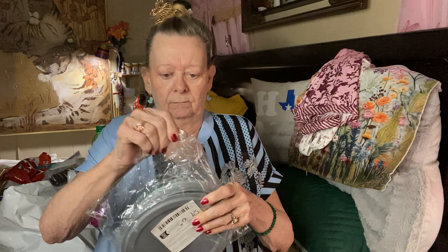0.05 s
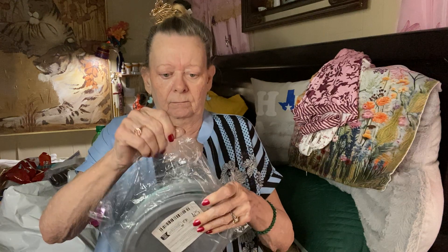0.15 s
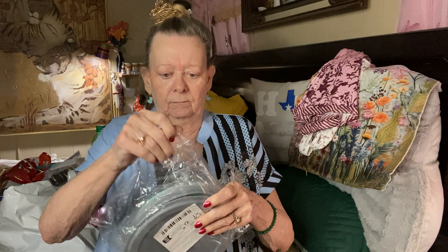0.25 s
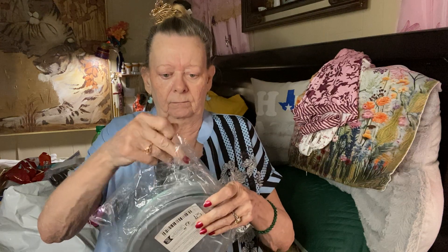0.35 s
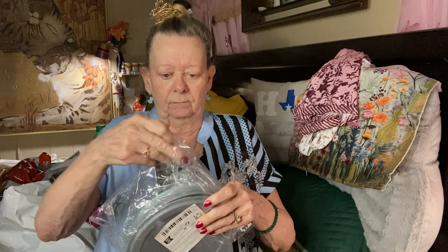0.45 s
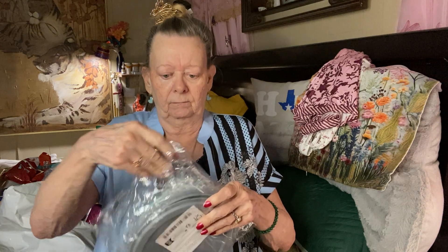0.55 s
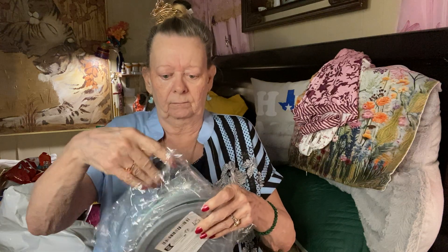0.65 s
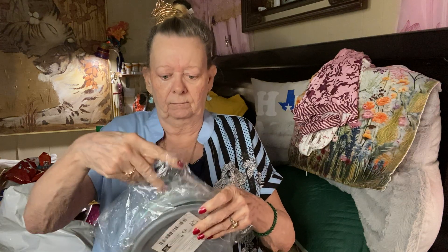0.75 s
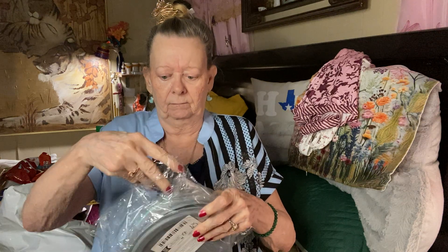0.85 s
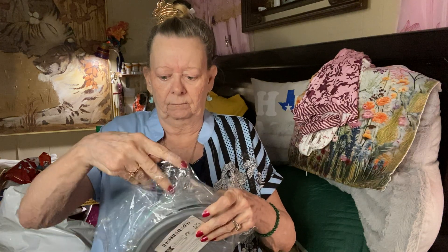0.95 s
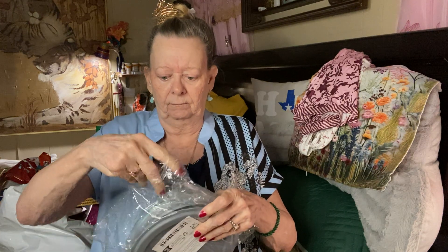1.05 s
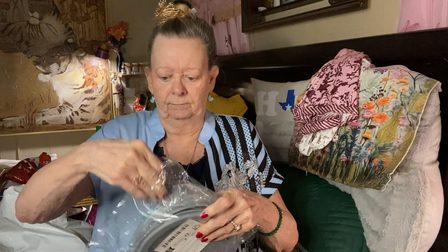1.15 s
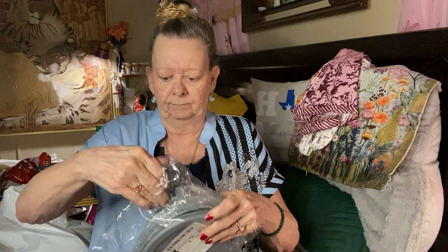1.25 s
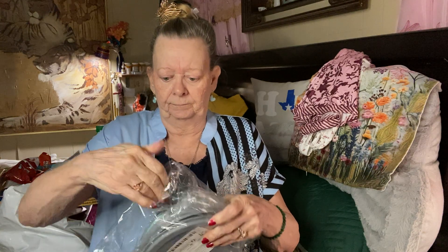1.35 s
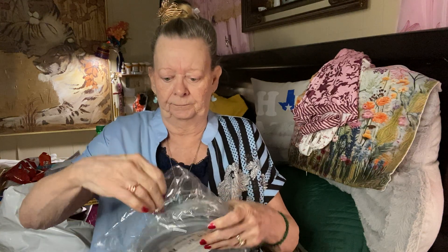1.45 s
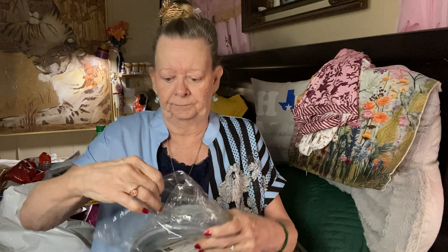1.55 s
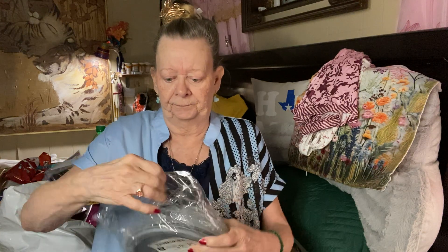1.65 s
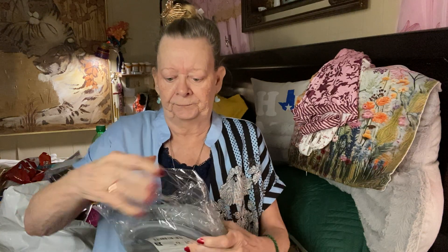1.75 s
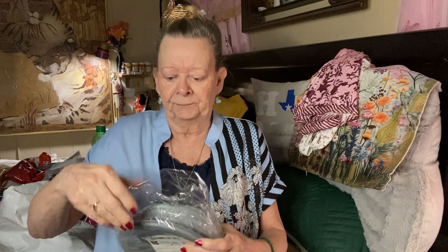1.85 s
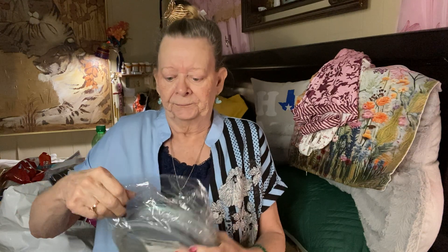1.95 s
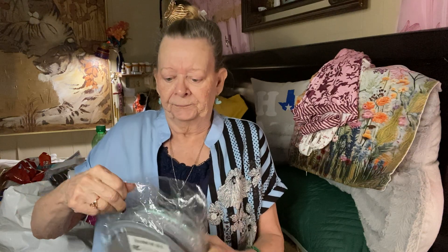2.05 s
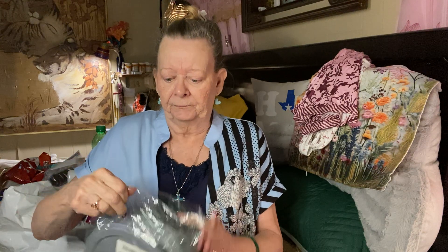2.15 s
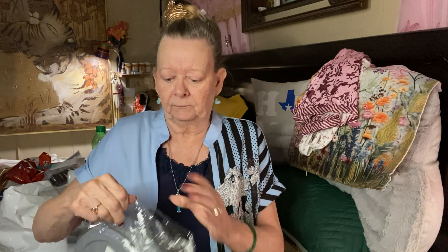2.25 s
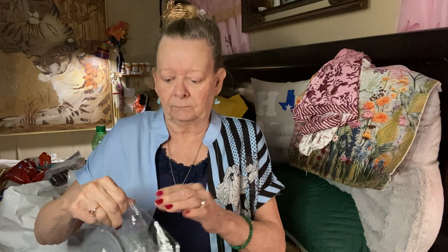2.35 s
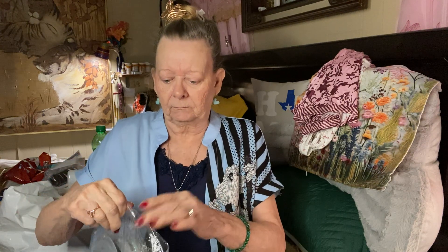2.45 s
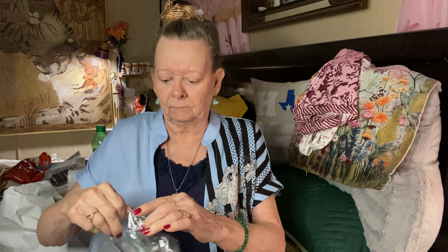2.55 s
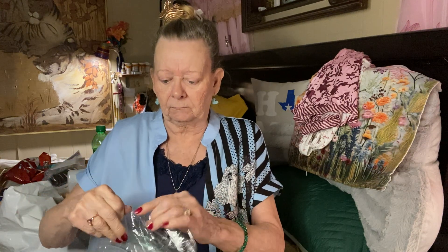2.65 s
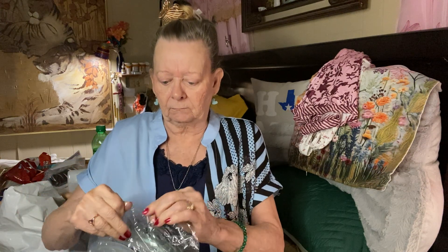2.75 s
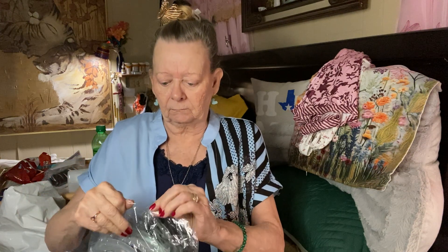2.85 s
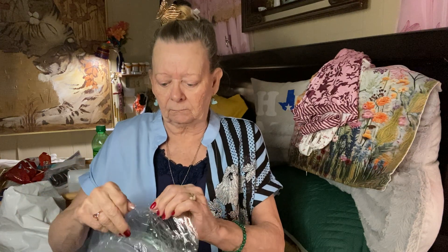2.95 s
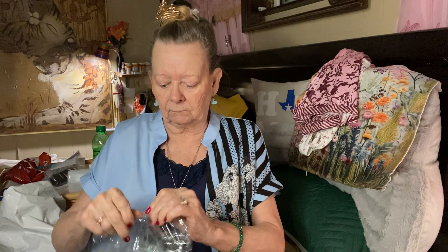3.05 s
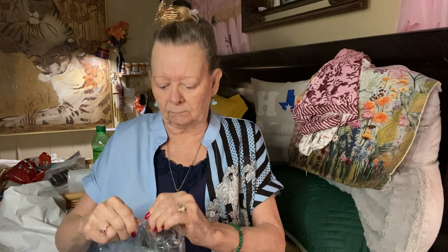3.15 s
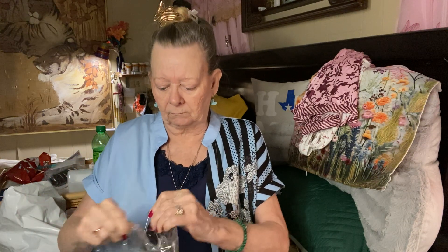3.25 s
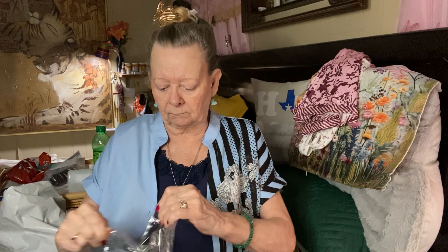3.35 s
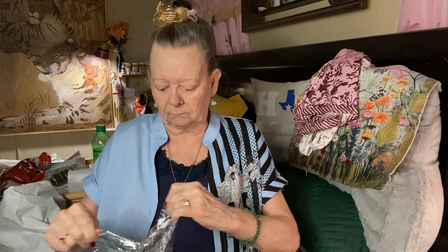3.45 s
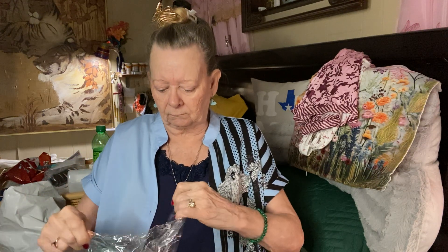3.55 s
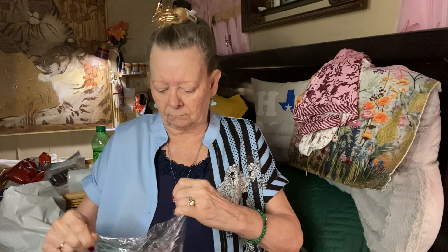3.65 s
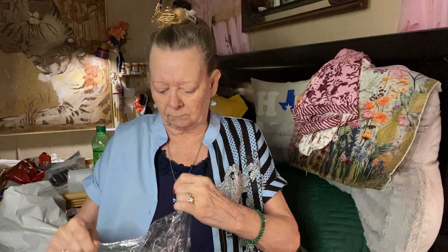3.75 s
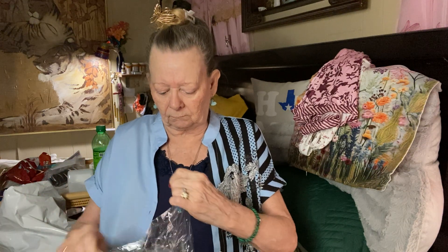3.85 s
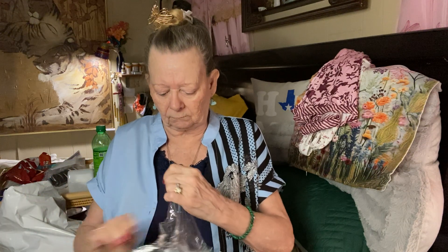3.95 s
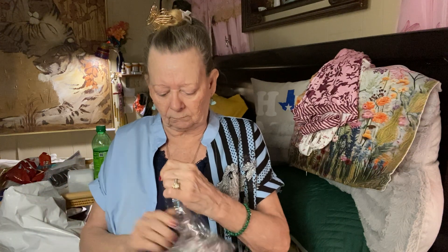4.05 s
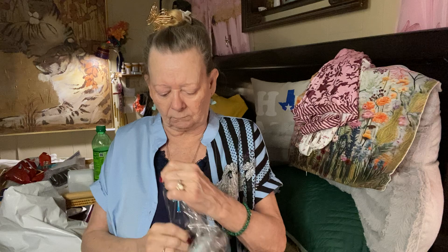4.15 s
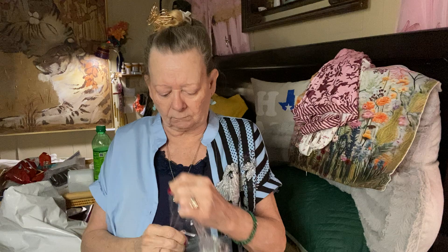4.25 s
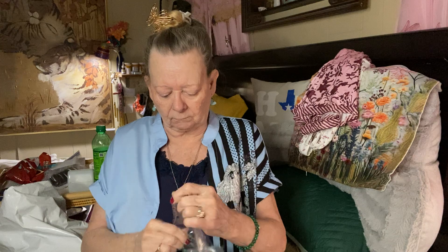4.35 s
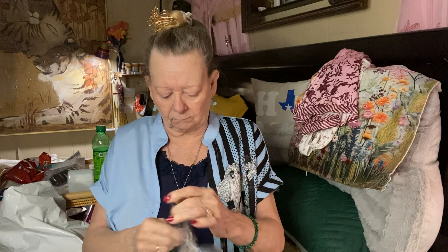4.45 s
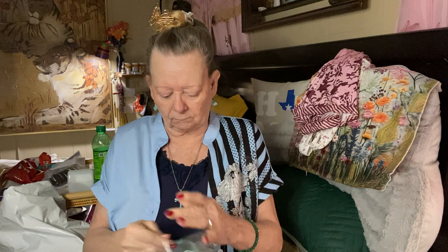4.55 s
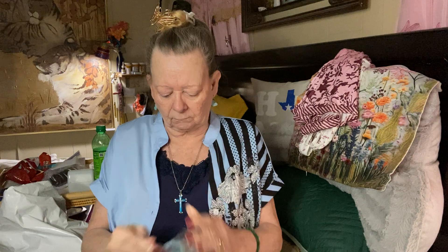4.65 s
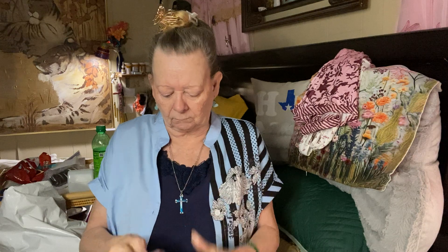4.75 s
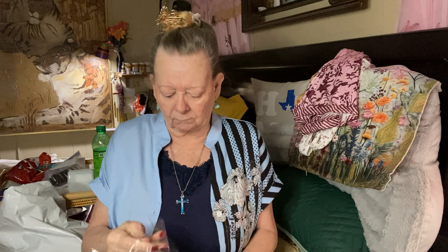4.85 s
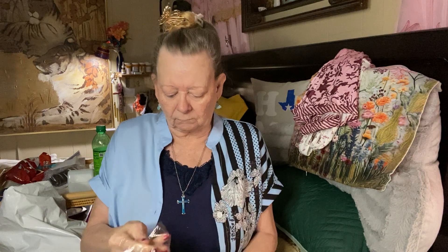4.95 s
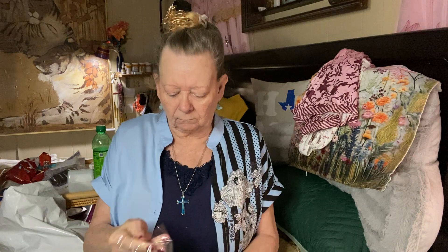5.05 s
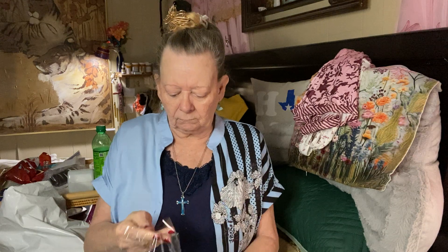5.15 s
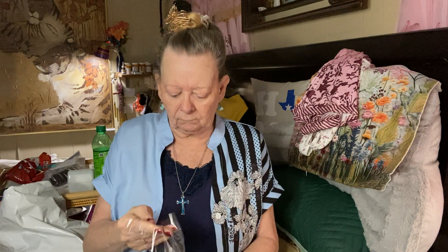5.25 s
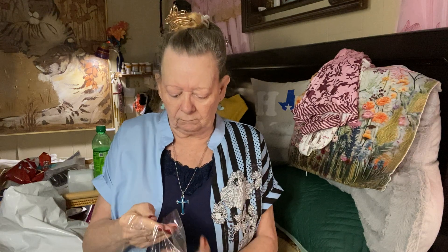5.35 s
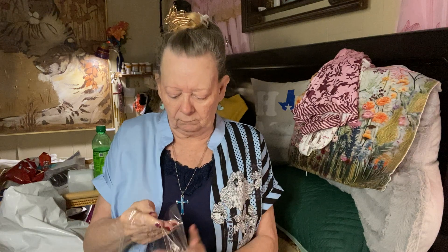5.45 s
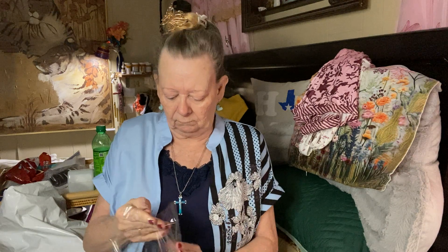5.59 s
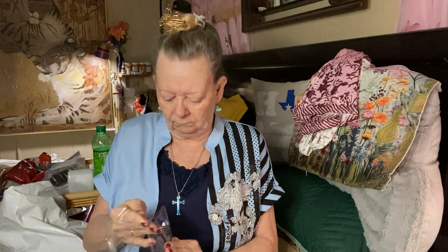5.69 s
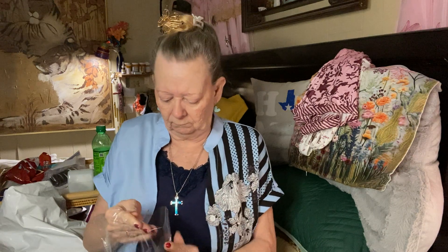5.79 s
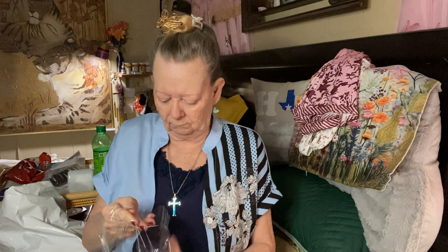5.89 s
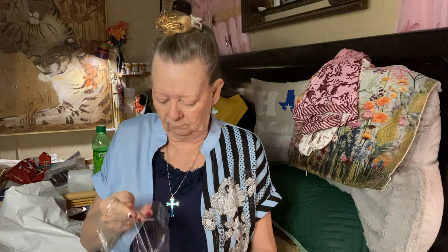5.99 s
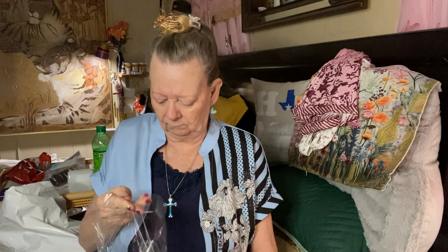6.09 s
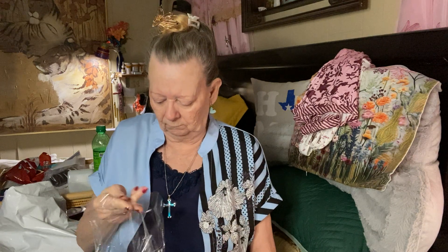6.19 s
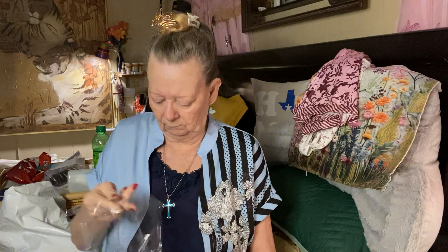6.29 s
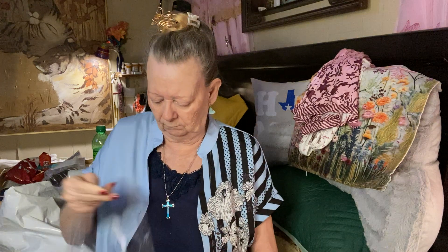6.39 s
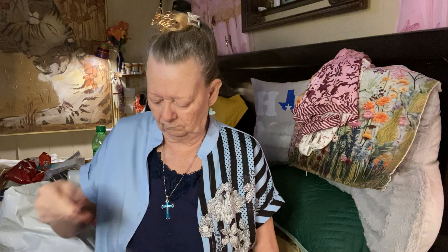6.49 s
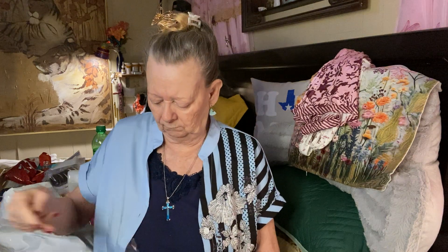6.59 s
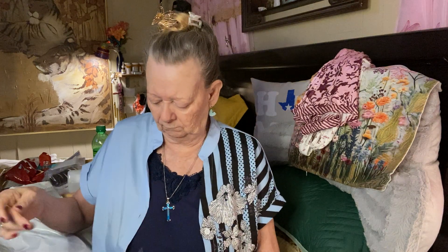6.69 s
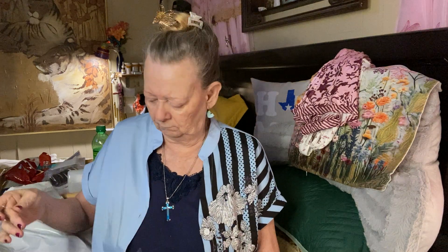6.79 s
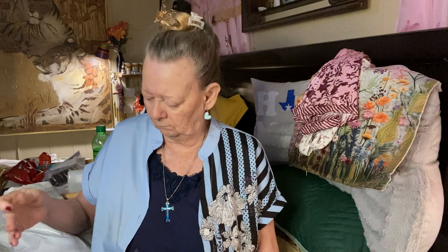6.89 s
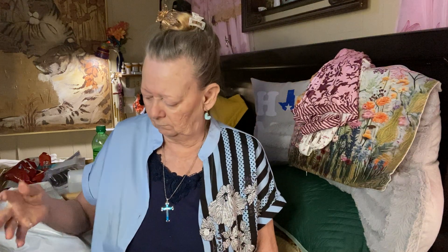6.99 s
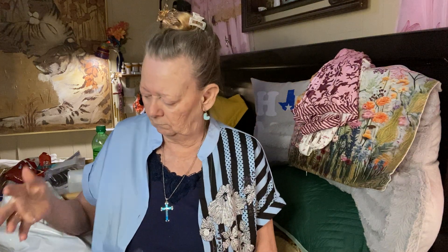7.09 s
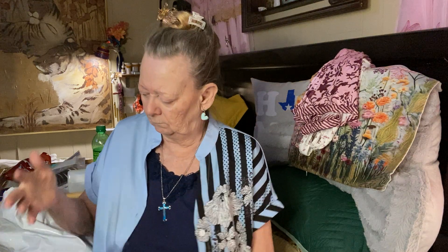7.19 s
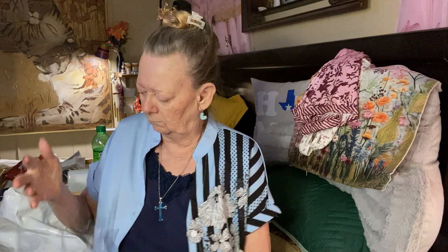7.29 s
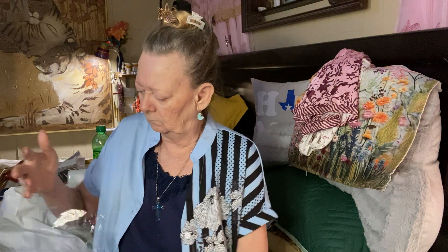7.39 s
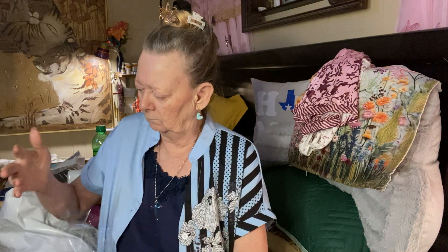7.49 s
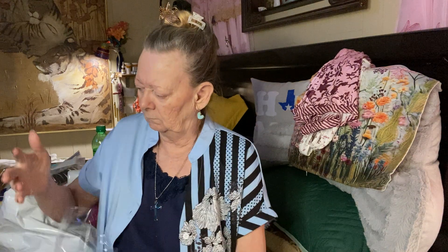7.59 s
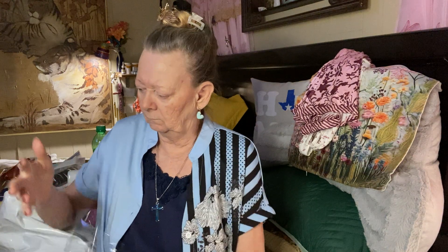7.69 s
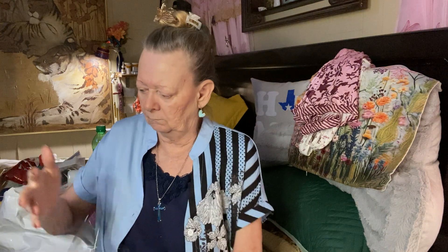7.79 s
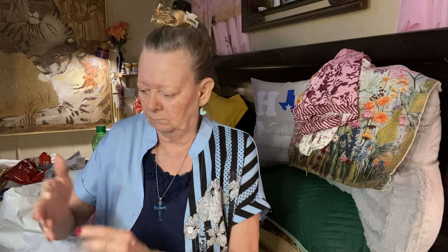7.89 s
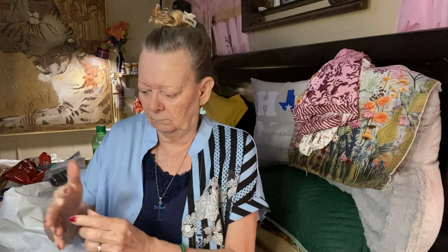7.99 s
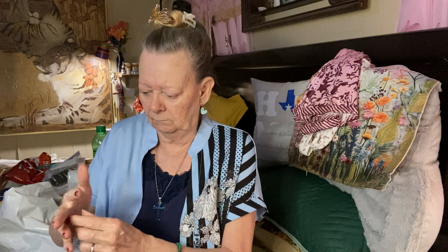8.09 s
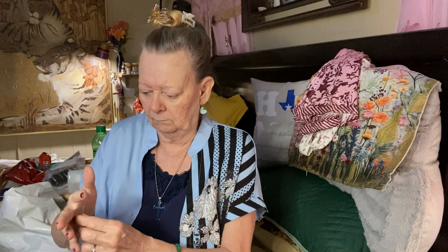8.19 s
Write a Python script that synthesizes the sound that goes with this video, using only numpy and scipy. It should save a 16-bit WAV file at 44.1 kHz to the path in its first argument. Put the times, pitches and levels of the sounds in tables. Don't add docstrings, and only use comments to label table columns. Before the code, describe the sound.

Hands pick at thin plastic film around a hollow roll, very close in a soft furnished room. Clumps of tiny bright cracks and sharp snaps come in short strokes, with a faint hollow ring. After three seconds the wrap tears in much louder bursts, strongest near 3.4 and 4.7 seconds. A dull rub on cloth follows, then one more crisp crackle, and sparse faint ticks as the crushed film settles.

```python
import sys
import numpy as np
from scipy import signal
from scipy.fft import rfft, irfft, next_fast_len
from scipy.io import wavfile
from scipy.ndimage import uniform_filter1d, map_coordinates

SR = 44100
rng = np.random.default_rng(int(sys.argv[2]) if len(sys.argv) > 2 else 0)


def file_out(sig):
    cols = np.atleast_2d(sig).T
    lim = np.clip(cols, -1, 1)
    pcm = np.round(lim * 32767).astype(np.int16)
    wavfile.write(sys.argv[1], SR, pcm)


def convert_level_to_amplitude(level_db):
    exponent = np.asarray(level_db, float) / 20
    return 10 ** exponent


N = 362943

# start in seconds, length in seconds, film level in dB, drift to its end in dB, roll in dB re film.
PICKING_STROKES = [(0.0, 0.19, -47, -3, -10.5), (0.201, 0.19, -49, 4, -10), (0.455, 0.17, -47.5, 2.5, -11),
                   (0.678, 0.023, -35, -2, -13), (0.731, 0.13, -41, -4, -13),
                   (0.904, 0.13, -52.5, 6.5, -24), (1.066, 0.29, -46, -8.5, -25),
                   (1.407, 0.24, -43, -5.5, -20), (1.688, 0.033, -47.5, -4.5, -17),
                   (1.838, 0.033, -60, 0, -17), (1.887, 0.021, -40, -2, -22), (1.93, 0.31, -44, -5.5, -21),
                   (2.319, 0.17, -48, -6.5, -25), (2.525, 0.3, -46, -9, -23), (2.764, 0.27, -53, 11, -16.5),
                   (3.06, 0.22, -48, 8, -12), (3.317, 0.2, -33, -6, -15.5), (3.421, 0.11, -37, -5.5, -11.5),
                   (3.599, 0.24, -52.5, 7, -15.5), (3.877, 0.17, -47, -8.5, -26)]
# start in seconds, length in seconds, film level in dB, drift to its end in dB, roll in dB re film.
PULLING_STROKES = [(4.051, 0.088, -47, 3.5, -21.5), (4.184, 0.081, -43.5, -1.5, -18.5),
                   (4.299, 0.0089, -43.5, 10, -21), (4.377, 0.032, -31.5, -5, -15),
                   (4.447, 0.17, -49.5, 4.5, -19), (4.582, 0.11, -40, -13.5, -24.5),
                   (4.727, .01, -33, -2, -29), (4.738, 0.12, -29, -10.5, -18),
                   (4.861, 0.061, -36, 5.5, -15), (4.957, 0.058, -43.5, -10, -12),
                   (5.041, 0.12, -47.5, -6.5, -12.5), (5.205, 0.084, -51, -4.5, -13.5),
                   (5.343, 0.15, -65.5, 5.5, -9), (5.477, 0.22, -43.5, -13.5, -13),
                   (5.738, 0.11, -58.5, -1, -15), (5.898, 0.19, -49.5, -3.5, -16.5),
                   (6.092, 0.19, -50, 6.5, -15.5), (6.288, 0.066, -36.5, 3, -16.5),
                   (6.372, 0.044, -36, -3, -6), (6.465, 0.034, -43, 3.5, -14.5),
                   (6.538, 0.17, -56.5, -14, -14), (6.81, 0.77, -69.5, 14, -20),
                   (7.395, 0.074, -43, -4.5, -12), (7.487, 0.21, -59, 4, -12), (7.75, 0.24, -65.5, -4, -21),
                   (8.036, 0.16, -67, 6.5, -11)]
ATTACK_DB_PER_S, RELEASE_DB_PER_S, STILL_DB = 789, 498, -101.5
STEP_S = .001

# frequency in Hz, level in dB.
FILM_COLOUR = [(1800, -92), (2800, -8.5), (4300, 1), (6500, 0.5), (9000, -1.5), (11000, 0.5), (13000, -9.5),
               (15000, -16.5), (16400, -39)]
# frequency in Hz, level in dB.
BODY_COLOUR = [(700, -43), (1150, -6.5), (1600, 0), (2400, -4.5), (3200, -13.5), (4500, -32.5)]
BODY_DB = -10.5
# resonance in Hz, width in Hz, level in dB.
POUCH_MODES = [(950, 195, 3.5), (884, 450, 0)]
# time in seconds, pouch level in dB re film.
POUCH_SHUT = [
    (0, -17),
    (.85, -19.5),
    (1.4, -26.5),
    (2.6, -26.5),
    (3.4, -30),
    (5.3, -23),
    (6.2, -22.5),
    (7.3, -17),
    (7.8, -13.5),
    (8.23, -11),
]
# resonance in Hz, width in Hz, level in dB.
ROLL_MODES = [(528, 112, -3), (360, 53, -17), (770, 140, -4)]

# time in seconds, peak in dB, pitch in Hz.
PICK_SNAPS = [(0.004, -26, 6540), (0.0775, -45, 7050), (0.0909, -46, 7390), (0.1156, -27, 6200),
              (0.1542, -22.5, 6300), (0.1598, -30, 6590), (0.1624, -40, 6750), (0.2026, -43, 7690),
              (0.2344, -31, 7490), (0.2629, -38, 4590), (0.2699, -28.5, 6700), (0.2997, -23, 6500),
              (0.3262, -25.5, 5200), (0.4591, -41, 7300), (0.4691, -26, 4550), (0.4747, -33, 5670),
              (0.5141, -24.5, 6050), (0.5355, -32, 7340), (0.5439, -39, 5240), (0.6235, -35.5, 3770),
              (0.6344, -43, 7390), (0.6587, -27, 7190), (0.685, -19, 6000), (0.7104, -22, 4630),
              (0.716, -26, 4130), (0.7563, -28.5, 7400), (0.8201, -29, 5000), (0.839, -32.5, 4900),
              (0.8766, -24, 4400), (0.8816, -32, 6010), (0.9081, -33, 5840), (0.9488, -31, 5430),
              (0.9531, -40, 5020), (0.9582, -34, 5000), (0.9894, -27, 5340), (1.0193, -27, 6980),
              (1.0395, -25.5, 5320), (1.0451, -30, 5150), (1.073, -36, 5050), (1.0779, -28, 5080),
              (1.1254, -27, 9600), (1.1476, -23.5, 6450), (1.1704, -23, 4230), (1.1791, -28, 9450),
              (1.2138, -28, 7100), (1.2259, -27, 4130), (1.3248, -35, 4890), (1.356, -37, 5940),
              (1.4088, -37, 6910), (1.4175, -31, 6480), (1.4338, -19.5, 4240), (1.4968, -31, 3600),
              (1.6303, -30, 7300), (1.6929, -33, 6330), (1.7005, -32, 5060), (1.7092, -30.5, 4060)]
# time in seconds, peak in dB, pitch in Hz.
TEAR_SNAPS = [(1.84, -53, 4540), (1.885, -30, 5100), (1.8928, -21, 5100), (1.9, -22.5, 4750),
              (1.984, -29, 4570), (1.9953, -19.5, 6500), (1.9972, -25, 7040), (2.0296, -31.5, 7640),
              (2.0306, -20.5, 7350), (2.0838, -25, 4930), (2.0867, -25, 5790), (2.1609, -31, 5190),
              (2.1663, -29, 4830), (2.175, -32, 5660), (2.2, -32, 5580), (2.2079, -34, 5640),
              (2.2239, -24, 5400), (2.249, -37.0, 4870), (2.252, -26.5, 5040), (2.2589, -38, 7450),
              (2.289, -25, 5170), (2.3231, -32, 4120), (2.3456, -31, 4800), (2.3567, -28, 5300),
              (2.3844, -34, 6550), (2.4786, -29, 4780), (2.4829, -30, 4600), (2.5863, -27.5, 7200),
              (2.629, -42, 8050), (2.717, -45, 4060), (2.7856, -25.5, 5450), (2.8058, -34, 7000),
              (2.8145, -34, 5600), (2.8754, -22.5, 6460), (2.901, -40, 5300), (2.9078, -26, 6660),
              (2.938, -25, 5500), (2.9836, -20, 5150), (3.0595, -23, 4360), (3.0645, -23, 4570),
              (3.081, -30, 4260), (3.1108, -24.5, 5070), (3.1193, -29, 4840), (3.1367, -40, 5380),
              (3.187, -24, 4900), (3.1915, -29, 6000), (3.2305, -17.5, 5300), (3.301, -17, 6540),
              (3.4599, -16, 4640), (3.4677, -12.5, 4260), (3.4755, -12, 8300), (3.5058, -12.5, 5540),
              (3.51, -17, 5580), (3.517, -12, 5400), (3.5277, -13.5, 7300), (3.532, -22, 5100),
              (3.6353, -34, 4540), (3.693, -34, 4750), (3.75, -29, 4780)]
# time in seconds, peak in dB, pitch in Hz.
CRUSH_SNAPS = [(3.7642, -29, 4350), (3.7903, -32, 5160), (3.809, -27, 8150), (3.839, -36, 7040),
               (3.8547, -33, 5320), (3.909, -38, 5160), (3.9447, -31, 7880), (3.975, -35, 5230),
               (4.027, -36, 4670), (4.0756, -29, 5300), (4.1047, -25, 6460), (4.188, -16, 6370),
               (4.194, -22, 5170), (4.2882, -24, 8900), (4.2984, -27, 8380), (4.3152, -24, 3430),
               (4.3191, -20, 4200), (4.3593, -17, 4090), (4.366, -17, 5200), (4.37, -18.5, 4500),
               (4.389, -16, 4530), (4.39, -21, 4440), (4.4083, -31, 5840), (4.4235, -21.5, 5000),
               (4.5068, -20.5, 5000), (4.5782, -23, 4520), (4.659, -29, 7060), (4.689, -29.5, 5210),
               (4.7198, -18, 4690), (4.7283, -21, 5200), (4.7313, -14, 4840), (4.7449, -22, 4700),
               (4.802, -21.5, 4720), (4.8085, -31, 5450), (4.8724, -20, 6450), (4.881, -18, 5560),
               (4.9155, -15, 5240), (5.038, -17, 8840), (5.2187, -31, 6030), (5.2227, -24, 6840),
               (5.229, -30, 6720), (5.2563, -32, 6800), (5.273, -34.5, 8100), (5.3625, -40.5, 8760),
               (5.4112, -35.5, 9100), (5.441, -37, 8310), (5.4725, -45, 8300), (5.4753, -46, 9200),
               (5.508, -26, 6400), (5.5534, -30, 4540), (5.6016, -30.5, 4740), (5.6586, -34, 3940),
               (5.6855, -30, 4900), (5.7416, -35, 7360), (5.7537, -35, 7820)]
# time in seconds, peak in dB, pitch in Hz.
SETTLE_SNAPS = [(5.7655, -33, 8550), (5.8175, -44, 4180), (5.8587, -36, 4950), (5.8645, -44, 6650),
                (5.903, -35, 4700), (5.98, -52, 3050), (6.003, -50, 7760), (6.052, -36, 4560),
                (6.096, -30, 3250), (6.147, -45, 6350), (6.1734, -33, 6500), (6.183, -23.5, 5200),
                (6.1887, -22, 7410), (6.224, -30, 3770), (6.247, -32, 4250), (6.288, -23, 4170),
                (6.3236, -24, 5730), (6.5082, -24, 5840), (6.5107, -39, 5900), (6.6168, -42, 4840),
                (6.6211, -40, 8000), (6.6732, -44, 9470), (6.691, -40.5, 5500), (6.7601, -51.5, 6200),
                (6.8073, -56, 5940), (6.819, -58, 5200), (6.852, -44, 6140), (6.9165, -56, 8120),
                (6.933, -35, 8200), (6.9907, -43, 4890), (7.0313, -42, 4520), (7.0383, -41, 7110),
                (7.0928, -44, 4660), (7.127, -46, 7840), (7.1325, -37.5, 4760), (7.2074, -46, 6480),
                (7.2513, -38, 4970), (7.2805, -39, 7620), (7.3195, -35.5, 6200), (7.338, -38, 5240),
                (7.352, -38, 5620), (7.3972, -47, 5150), (7.5264, -37, 8150), (7.53, -36, 7990),
                (7.547, -33, 8200), (7.583, -30.5, 4430), (7.59, -46, 6590), (7.6633, -35, 6440),
                (7.667, -33, 7400), (7.7202, -35.5, 8600), (7.786, -40, 6600), (7.843, -47, 8050),
                (7.8993, -42, 6760), (7.934, -45, 8610), (8.0459, -41, 5640), (8.103, -39.5, 8900),
                (8.1478, -46, 4900), (8.1505, -42, 6010), (8.1763, -41, 6980)]
# frequency in Hz, level in dB.
CLICK_COLOUR = [(1500, 2.5), (4000, -3.5), (8500, 3), (12000, 1), (16400, -20)]
# time in seconds, peak in dB, pitch in Hz.
KNOCKS = [(0.148, -39.5, 942), (0.303, -37, 930), (0.373, -43, 482), (0.469, -38, 920), (0.512, -36, 964),
          (0.68, -39, 995), (0.761, -40, 970), (0.586, -44, 954), (1.433, -48, 946), (2.345, -50, 586),
          (2.567, -42, 980), (2.594, -44, 520), (3.364, -39, 430), (3.475, -53, 457), (3.504, -42, 479),
          (4.312, -27.5, 997), (4.372, -36.5, 585), (4.718, -46, 557), (4.766, -37.5, 610),
          (4.808, -37, 563), (5.503, -47.5, 522), (6.292, -28.5, 523), (6.319, -33, 537), (6.359, -31, 710),
          (6.389, -32, 510), (7.65, -42.5, 987)]
# time in seconds, peak in dB, pitch in Hz.
POPS = [(0.2026, -44, 920), (0.5132, -30.5, 950), (0.6988, -46, 1010), (2.0504, -44, 2030),
        (2.1668, -39.5, 1950), (2.176, -43, 1740), (2.2904, -45.5, 1590), (2.488, -44.5, 1450),
        (2.5691, -44, 950), (2.8755, -46, 1740), (3.017, -40, 1400), (3.1106, -43, 2450),
        (3.174, -40, 1490), (3.188, -36.5, 2110), (3.2305, -29.5, 2420), (3.504, -22, 1880),
        (4.1882, -30.5, 2230), (4.261, -42, 2450), (4.298, -29.5, 2150), (4.3143, -29.5, 1060),
        (4.39, -30, 2590), (4.5074, -32, 1690), (4.579, -41, 2000), (4.7715, -23.5, 1720),
        (4.8015, -27, 1290), (4.9139, -33, 950), (5.0393, -37, 2120), (5.127, -37.5, 1040),
        (5.229, -37, 2000), (5.5086, -29, 1850), (5.6015, -42.5, 2060), (5.659, -41.5, 2310),
        (5.744, -45, 1640), (5.7656, -46, 1710), (6.0984, -38.5, 1470), (6.182, -34.5, 2060),
        (6.3264, -30.5, 1500), (6.5094, -31, 1710), (6.6939, -54, 1690), (6.8718, -51.5, 2310),
        (7.0936, -53, 2330), (7.133, -56, 2430), (7.2519, -49, 2080), (7.3199, -52, 2290),
        (7.4327, -37, 1930), (7.65, -41.5, 1440), (7.72, -46, 1280), (7.7865, -47, 1040),
        (8.0484, -54, 1510), (8.114, -49.5, 1040)]
# frequency in Hz, level in dB.
POP_COLOUR = [(400, -20), (850, 2), (2500, -2.5), (8000, 13)]
SNAP_RISE_S, POP_RISE_S, KNOCK_RISE_S = .0003, 0.00064, 0.0034

# time in seconds, level in dB, swell in seconds.
LAP_BUMPS = [
    (.33, -57, 0.027),
    (3.51, -62.5, 0.025),
    (4.95, -63, 0.018),
    (5.27, -71, 0.056),
    (5.385, -55, 0.019),
    (6.39, -81, 0.0091),
    (7.41, -72, 0.025),
]
# resonance in Hz, width in Hz, level in dB.
THUMP_MODES = [(151, 174, -10.5), (295, 127, -7.5)]
THUMP_DB, LAP_REST_DB = -16, -85
# time in seconds, level in dB, swell in seconds.
LAP_DRAGS = [
    (5.235, -52, 0.015),
    (5.29, -63, .018),
    (5.39, -41.5, 0.015),
    (5.462, -43.5, 0.0078),
]
SWAY_HZ = 154.7
# time in seconds, level in dB, swell in seconds.
WEIGHT_SHIFTS = [
    (.3, -67, 0.21),
    (1.91, -59, 0.017),
    (4.88, -58, 0.048),
    (5.35, -61, 0.13),
    (6.35, -65, 0.087),
    (7.45, -68, 0.034),
]
# frequency in Hz, level in dB.
SEAT_COLOUR = [(25, -2.5), (55, -4), (85, -17.5), (120, -7), (160, -21)]
SEAT_REST_DB, SEAT_DB, SEAT_LAG_S = -79, -41, 0.059

# frequency in Hz, level in dB.
AIR_COLOUR = [(30, -20), (60, 7), (120, 6), (300, -12.5), (1000, -2.5), (5000, -17.5), (12000, -22),
              (16000, -54)]
# frequency in Hz, time to fall 60 dB in seconds.
ROOM_DECAY = [(200, 0.17), (2000, 0.18), (10000, 0.11)]
# frequency in Hz, level in dB.
ROOM_UNLIKE = [(60, 2), (150, -7), (600, -7), (1800, -2.5), (2900, 2.5), (4200, 0), (5400, 1.5),
               (7700, 1.5), (9000, 3), (10500, -16.5), (12000, -5), (15000, -10)]
# frequency in Hz, lead in rad.
LEFT_LEAD = [(40, -3.1), (140, -1.6), (430, 0), (820, 2.6), (1300, 6.1), (2000, 7.3), (2500, 6.8),
             (3400, 12), (4100, 12.7), (5000, 11.5), (5800, 7.1), (7300, 4.8), (8000, 6.6), (10500, 9.42),
             (13100, 12.57), (15000, 15.5), (16500, 17.2)]
# frequency in Hz, lead in rad.
HELD_UP_LEAD = [(40, 3.2), (215, 4.4), (340, 3.9), (520, 4.6), (780, 4.8), (990, 6.3), (1080, 7.7),
                (1200, 5.5)]
# frequency in Hz, level difference in dB.
LEFT_OVER_RIGHT = [(60, 3), (200, 0), (2000, 1), (3500, 4), (5300, 7), (7500, 4.5), (9500, 0), (16000, 0)]
LOWERED_S, LOWERING_S = 3.06, .1


def unit(x):
    return x / np.sqrt(np.mean(x ** 2) + 1e-20)


def along(points, hz):
    f, v = np.transpose(points)
    return np.interp(np.log(hz + 1), np.log(f + 1), v)


def curves(rows):
    s, *cols = np.transpose(rows)
    return [np.interp(np.arange(N) / SR, s, c) for c in cols]


def per_sample(slow):
    return np.interp(np.arange(N) / SR, np.arange(len(slow)) * STEP_S, slow)


def swells(rows):
    s, db, swell = np.transpose(rows)[..., None]
    t = np.arange(0, N / SR, STEP_S)
    bells = convert_level_to_amplitude(db) * np.exp(-.5 * ((t - s) / swell) ** 2)
    return per_sample(bells.sum(0))


def wobble(rate):
    knots = rng.standard_normal(int(N * rate / SR) + 4)
    return map_coordinates(knots, [np.arange(N) * rate / SR])


def filtered(x, response):
    m = next_fast_len(N + SR // 2)
    return irfft(rfft(x, m) * response(np.fft.rfftfreq(m, 1 / SR)), m)[..., :N]


def coloured(x, spectrum):
    points = [(1, -120)] + spectrum + [(SR, -120)]
    return filtered(x, lambda f: convert_level_to_amplitude(along(points, f)))


def ringing(x, modes):
    def response(f):
        total = 0
        for k, (centre, width, db) in enumerate(modes):
            resonance = 1j * f * width / (centre * centre - f * f + 1j * f * width)
            total = total + (-1) ** k * convert_level_to_amplitude(db) * resonance
        return total
    return filtered(x, response)


def cracks(start, gain, hz, life, rise=.00005, size=256):
    t = np.arange(size) / SR
    shape = convert_level_to_amplitude(-60 * t / np.reshape(life, (-1, 1))) * (1 - np.exp(-t / rise))
    waves = np.sin(2 * np.pi * hz[..., None] * t).sum(1) * shape * gain[:, None]
    place = (np.maximum(start, 0) * SR).astype(int)[:, None] + np.arange(size)
    return np.bincount(place.ravel(), waves.ravel(), N + SR)[:N]


def strokes():
    t = np.arange(0, N / SR, STEP_S)
    s, length, db, drift_db, roll_db = np.transpose(PICKING_STROKES + PULLING_STROKES)[..., None]
    edge_db = ATTACK_DB_PER_S * np.maximum(s - t, 0) + RELEASE_DB_PER_S * np.maximum(t - s - length, 0)
    film_db = db + drift_db * np.clip((t - s) / length, 0, 1) - edge_db

    def gain(level_db):
        power = convert_level_to_amplitude(STILL_DB) ** 2 + (convert_level_to_amplitude(level_db) ** 2).sum(0)
        return per_sample(np.sqrt(power))
    return gain(film_db), gain(film_db + roll_db)


def crackle(rate, spread_db, clump_db, hiss_db, count):
    clumps = convert_level_to_amplitude(clump_db * wobble(70))
    flow = np.cumsum(rate * clumps / SR)
    draw = rng.random((count, 7))
    start = np.interp(np.arange(count) + draw[:, 0], flow, np.arange(N) / SR, right=N / SR)
    gain = convert_level_to_amplitude(spread_db * draw[:, 1] ** 4)
    life = 0.0013 + 0.0024 * draw[:, 2]
    grains = cracks(start, gain, 200 + 15500 * draw[:, 3:], life, size=96)
    hiss = convert_level_to_amplitude(hiss_db) * np.sqrt(clumps) * rng.standard_normal(N)
    return unit(grains) + hiss


def film(effort, roll):
    drive = crackle(1600, spread_db=15, clump_db=3, hiss_db=-11.5, count=14500)
    bright = convert_level_to_amplitude(-2.0) * unit(coloured(drive, FILM_COLOUR))
    body = convert_level_to_amplitude(BODY_DB + 0.96 * wobble(4.09)) * unit(coloured(drive, BODY_COLOUR))
    bag_air = ringing(ringing(drive, POUCH_MODES), [(942, 230, 0)])
    pouch = convert_level_to_amplitude(curves(POUCH_SHUT)[0] + 6.0 + 2.3 * wobble(60)) * unit(bag_air)
    roll_air = ringing(ringing(drive, ROLL_MODES), [(530, 14000, 0)])
    hollow = convert_level_to_amplitude(1.0 + 1.33 * wobble(25)) * unit(roll_air)
    return effort * (bright + body + pouch) + roll * hollow


def still_air():
    return convert_level_to_amplitude(-78.0) * unit(coloured(rng.standard_normal(N), AIR_COLOUR))


def snaps():
    s, db, hz = np.vstack([PICK_SNAPS, TEAR_SNAPS, CRUSH_SNAPS, SETTLE_SNAPS]).T
    draw = rng.random((len(s), 22))
    s = s - SNAP_RISE_S
    spray_hz = 2500 + 950 * (np.arange(14) + draw[:, :14])
    click_hz = 3000 + 1700 * (np.arange(8) + draw[:, 14:])
    tone = cracks(s, convert_level_to_amplitude(db + 5.5), hz[:, None], 0.0021, SNAP_RISE_S)
    spray = cracks(s, convert_level_to_amplitude(db - 14.5), spray_hz, 0.011, SNAP_RISE_S)
    click = cracks(s, convert_level_to_amplitude(db - 9.0), click_hz, 0.0025, size=96)
    return coloured(tone + spray, FILM_COLOUR) + coloured(click, CLICK_COLOUR)


def knocks():
    s, db, hz = np.transpose(KNOCKS)
    return cracks(s, convert_level_to_amplitude(db + 0.5), hz[:, None], 0.061, KNOCK_RISE_S, size=1600)


def pops():
    s, db, hz = np.transpose(POPS)
    s = s - POP_RISE_S
    near_hz = 900 + 600 * (np.arange(3) + rng.random((len(s), 3)))
    note = cracks(s, convert_level_to_amplitude(db + 4.5), hz[:, None], 0.0085, POP_RISE_S, size=600)
    near = cracks(s, convert_level_to_amplitude(db - 1), near_hz, 0.0075, POP_RISE_S, size=600)
    return coloured(note + near, POP_COLOUR)


def lap(effort, roll):
    slips = convert_level_to_amplitude(2.5 * wobble(40)) * rng.standard_normal(N)
    thump = unit(ringing(ringing(slips, THUMP_MODES), [(182, 1300, 0)]))
    rub = (convert_level_to_amplitude(LAP_REST_DB) + convert_level_to_amplitude(THUMP_DB) * roll + swells(LAP_BUMPS)) * thump
    sway_hz = SWAY_HZ * (1 + 0.0359 * wobble(30))
    sway = swells(LAP_DRAGS) * np.sin(2 * np.pi * np.cumsum(sway_hz) / SR)
    shake = convert_level_to_amplitude(2.1 * wobble(15)) * rng.standard_normal(N)
    lagging = uniform_filter1d(effort, int(SEAT_LAG_S * SR))
    weight = convert_level_to_amplitude(SEAT_REST_DB) + convert_level_to_amplitude(SEAT_DB) * lagging + swells(WEIGHT_SHIFTS)
    return rub + sway + weight * unit(coloured(shake, SEAT_COLOUR))


def room(x, channels):
    out = np.zeros((channels, N + SR))
    span, delay = SR // 9, SR // 700
    for part in range(0, N, span):
        hz, t, z = signal.stft(rng.standard_normal((channels, SR // 6)), SR, nperseg=256)
        decay = convert_level_to_amplitude(-60 * t / along(ROOM_DECAY, hz)[:, None])
        tail = signal.istft(z * decay, SR, nperseg=256)[1]
        wet = signal.fftconvolve(x[None, part:part + span], tail / np.linalg.norm(tail[0]), axes=1)
        out[:, part + delay:][:, :wet.shape[1]] += wet
    return out[:, :N]


def ports(pair):
    def heard(lead):
        f, rad = np.transpose(lead)

        def response(hz):
            half = convert_level_to_amplitude(along(LEFT_OVER_RIGHT, hz) / 2) * np.exp(.5j * np.interp(hz, f, rad))
            return np.array([half, 1 / half])
        return filtered(pair, response)
    down = np.clip((np.arange(N) / SR - LOWERED_S) / LOWERING_S, 0, 1)
    treble = [point for point in LEFT_LEAD if point[0] > HELD_UP_LEAD[-1][0]]
    return (1 - down) * heard(HELD_UP_LEAD + treble) + down * heard(LEFT_LEAD)


def scene():
    effort, roll = strokes()
    bag = film(effort, roll) + still_air() + knocks() + pops()
    sharp = snaps()
    low = lap(effort, roll)
    sent = bag + convert_level_to_amplitude(-6.5) * sharp + convert_level_to_amplitude(1.0) * low
    common = convert_level_to_amplitude(-11.5) * room(sent, channels=1)
    unlike = coloured(room(sent, channels=2), ROOM_UNLIKE)
    return ports(bag + sharp + low + common + unlike)


def low_pass(x):
    return signal.sosfilt(signal.butter(12, 16100, fs=SR, output="sos"), x)


def record(dry):
    return low_pass(dry)


dry = scene()
out = record(dry)
file_out(out)
```